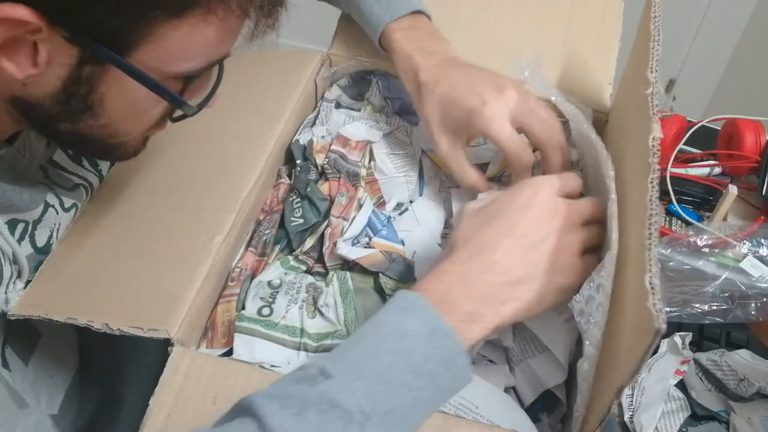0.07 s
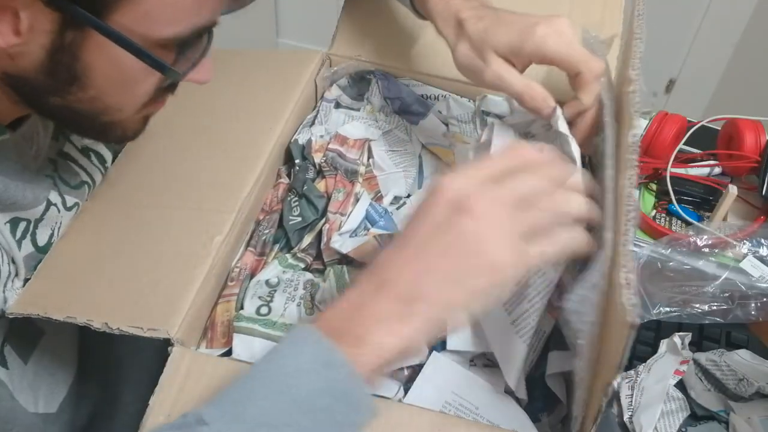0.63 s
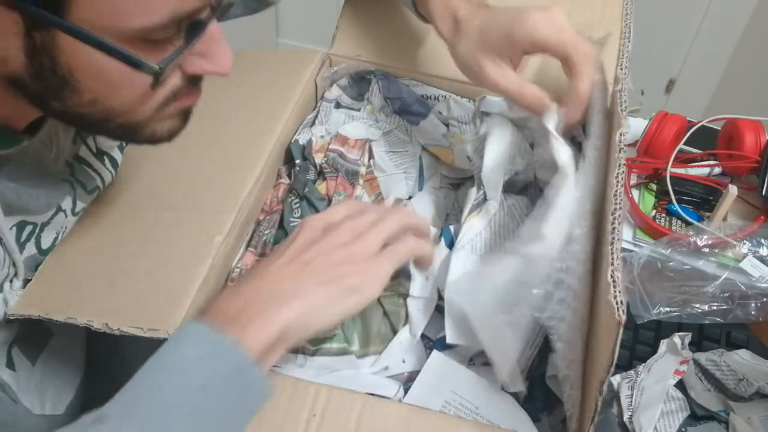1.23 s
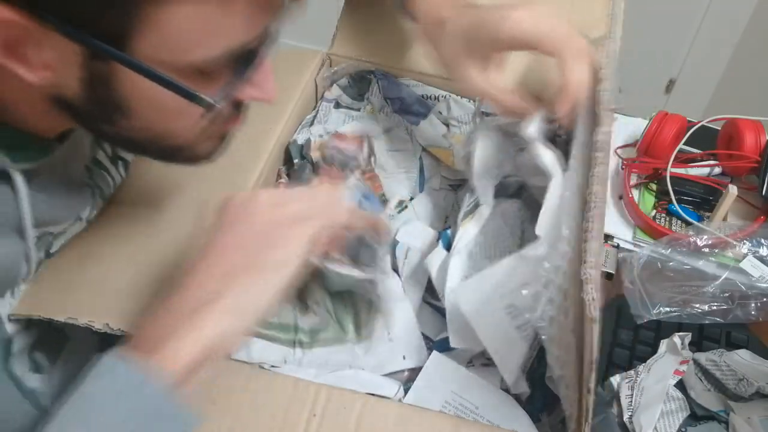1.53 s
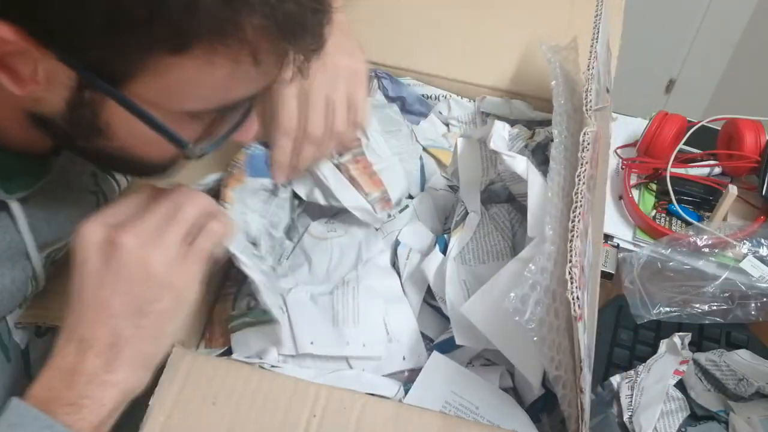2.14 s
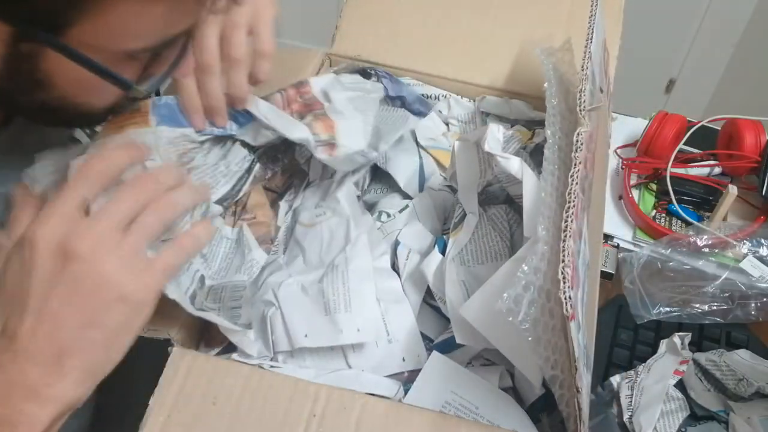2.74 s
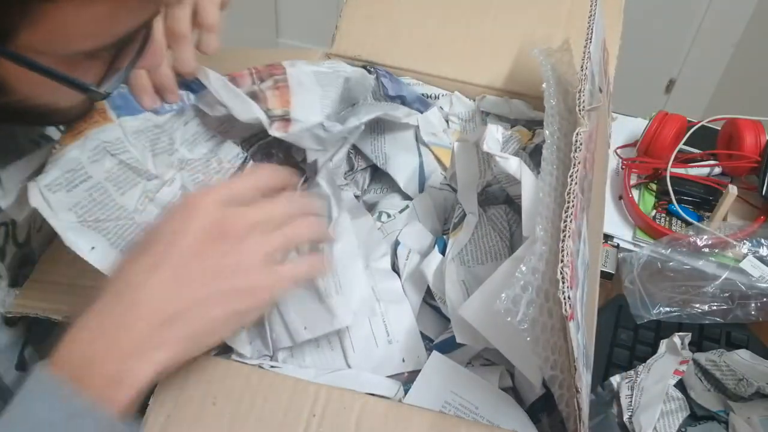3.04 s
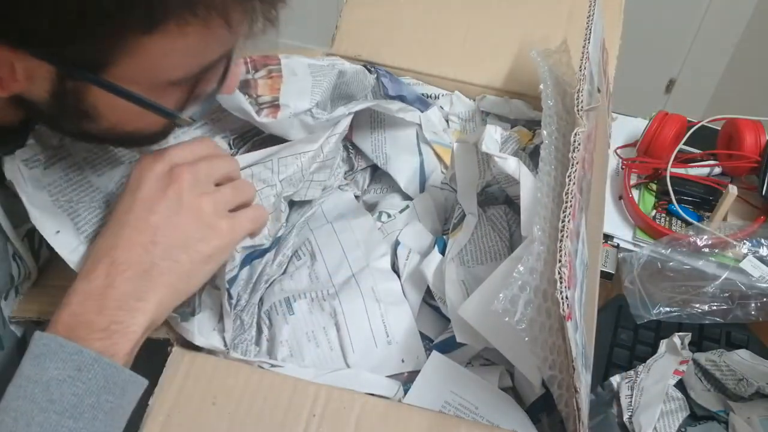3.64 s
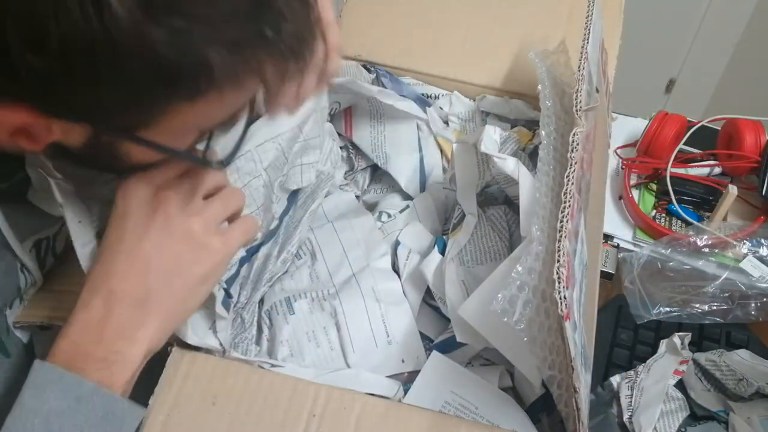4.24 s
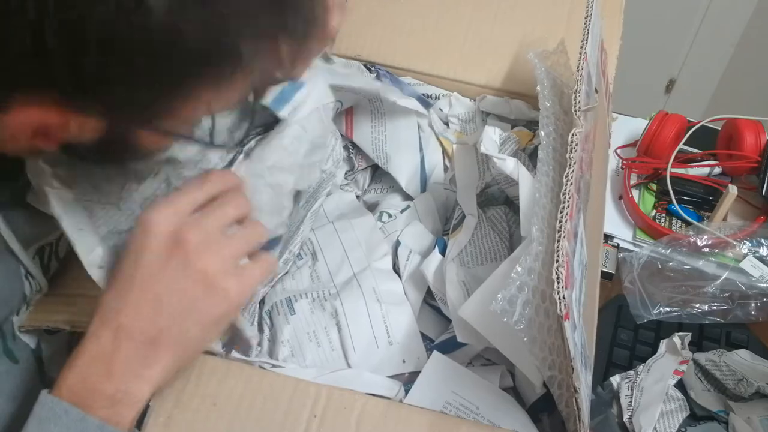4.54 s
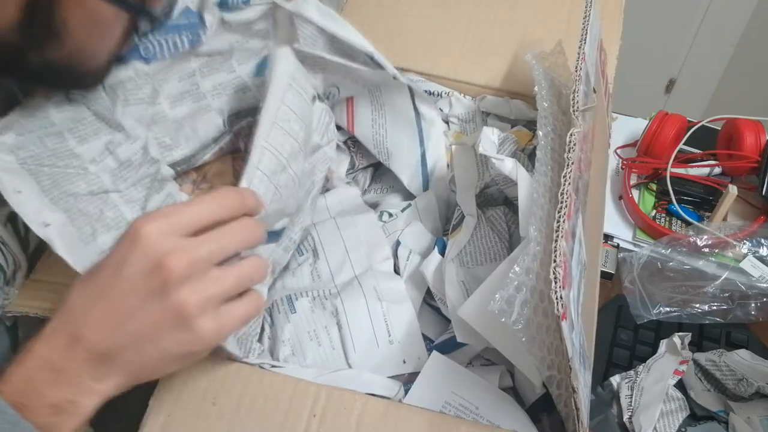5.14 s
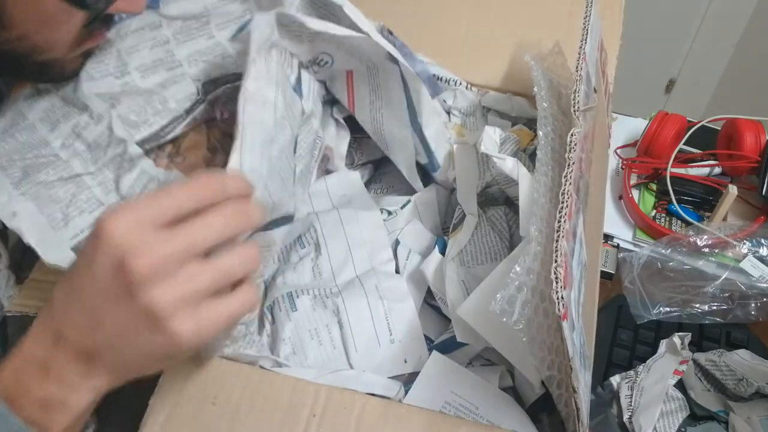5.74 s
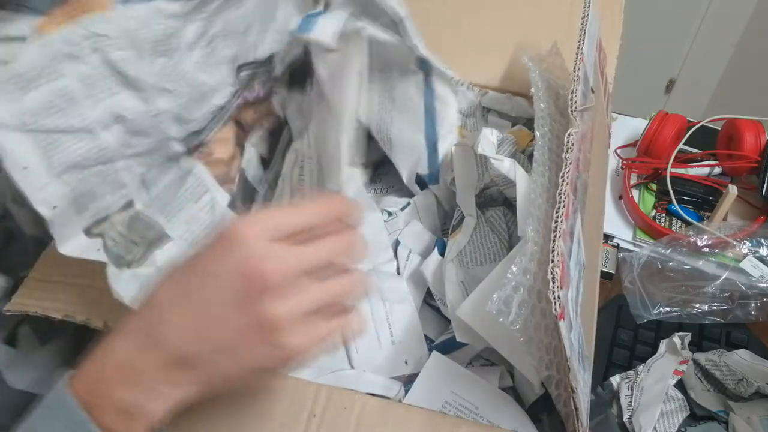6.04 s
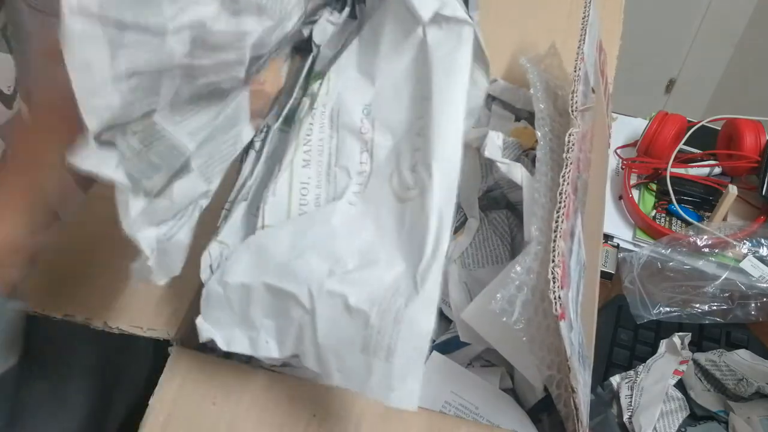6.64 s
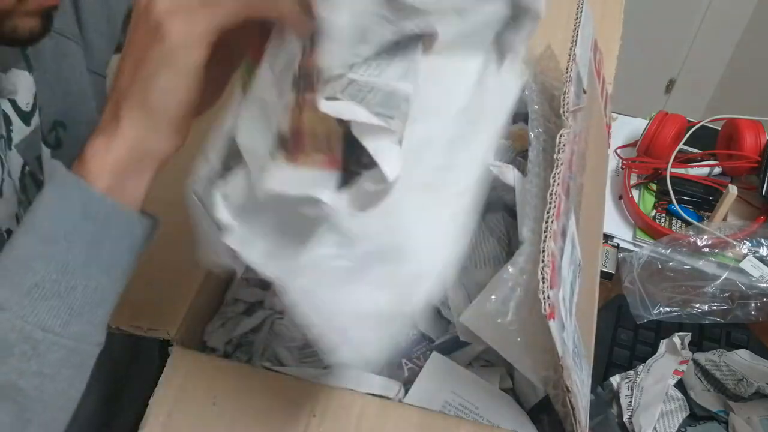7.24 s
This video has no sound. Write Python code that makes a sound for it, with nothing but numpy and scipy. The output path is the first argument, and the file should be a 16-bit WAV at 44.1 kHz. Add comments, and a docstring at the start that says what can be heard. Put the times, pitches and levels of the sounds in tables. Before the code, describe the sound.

Hands pull crumpled newspaper from a cardboard box, close to a stereo microphone in a small room with short echoes and a faint steady background. Light rustling opens the sound. From about 0.9 seconds the paper crinkles in short, uneven strokes, with bright, sharp snaps over a duller crackle of bending sheets. The box rumbles faintly under the dragging paper and gives soft thuds near 1 second and between 2.2 and 2.9 seconds. Snaps cluster around 3 seconds, followed by a brief sliding hiss and a flap at 3.4. After a lull, fuller, nearly continuous crinkling runs from 4 to 6 seconds, with a flurry of snaps near 4.7 and flaps and soft bumps around 5.6. The rustle eases, then swells as the sheet lifts clear, with a flap and the sharpest snap at about 7 seconds, faint puffs of air and a last crinkle.

```python
"""A small room, a stereo microphone close to a cardboard box: hands pull out crumpled newspaper.
Creases buckle in swarms of tiny clicks and single loud snaps; sheets flex, flip and slide over each other.
The box rumbles as paper drags on it and booms softly when bumped. Short echoes and faint room tone
lie behind it all, and the microphone's resonant ports colour the treble."""
import sys
import numpy as np
from scipy import signal
from scipy.fft import rfft, irfft
from scipy.io import wavfile
from scipy.ndimage import uniform_filter1d

SR = 44100
rng = np.random.default_rng(int(sys.argv[2]) if len(sys.argv) > 2 else 0)


def output_pcm(signal):
    """Save a mono or channel-first signal as 16-bit PCM at the path in sys.argv[1].

    Samples are clipped to [-1, 1] before scaling.
    """
    pcm = np.clip(np.atleast_2d(signal).T, -1, 1) * 32767
    wavfile.write(sys.argv[1], SR, np.round(pcm).astype(np.int16))


N = 330397
TIME = np.arange(N) / SR
CUTOFF_HZ = 16000


def handling(yield_db_per_s=13, stop_db_per_s=452, settle_db=-4, points=7500):
    """Crinkle and flex levels in dB: each hand stroke speeds up, eases as the paper yields, and stops."""
    # pushes, pulls and unfoldings: start_s, rise_s, hold_s, crinkle_db, flex_db
    strokes = [(0.0, 0.0042, 0.036, -42, -52), (.04, 0.11, 0.15, -49, -71),
               (0.151, 0.073, 0.18, -42.5, -49.5), (0.523, 0.034, 0.029, -46.5, -56.5),
               (.62, 0.077, 0.13, -57, -82), (0.784, 0.0046, 0.087, -46, -52),
               (0.884, 0.048, 0.061, -37.5, -45), (1.02, 0.022, 0.23, -49, -56.5),
               (1.239, 0.029, 0.042, -41, -47), (1.357, 0.0019, 0.021, -36.5, -45),
               (1.39, 0.095, 0.15, -51, -57.5), (1.51, 0.031, 0.21, -45.5, -49),
               (1.83, 0.0096, 0.28, -53.5, -59), (2.131, 0.0042, 0.01, -46, -52),
               (2.254, 0.0042, 0.15, -44.5, -55.5), (2.41, 0.008, 0.031, -37.5, -51),
               (2.472, 0.086, 0.079, -40, -49), (2.65, 0.017, 0.17, -54.5, -53.5),
               (2.823, 0.0078, 0.077, -40.5, -52.5), (2.92, 0.016, 0.027, -39.5, -45),
               (3.0, 0.027, 0.073, -69, -51), (3.116, 0.037, 0.13, -43.5, -50),
               (3.246, 0.012, 0.11, -35.5, -46.5), (3.526, 0.0052, 0.08, -45.5, -53),
               (3.765, 0.0034, 0.011, -51.5, -57.5), (4.05, 0.06, 0.14, -35.5, -45),
               (4.27, 0.04, 0.13, -41.5, -50.5), (4.419, 0.033, 0.23, -37.5, -46.5),
               (4.662, 0.0081, 0.273, -36, -45.5), (4.993, 0.009, 0.097, -43, -48),
               (5.066, 0.045, 0.12, -41.5, -48.5), (5.289, 0.083, 0.34, -41.5, -48),
               (5.598, 0.019, 0.038, -36.5, -42.5), (5.76, 0.11, 0.12, -44, -54),
               (5.95, 0.064, 0.087, -41.5, -48), (6.16, 0.11, 0.13, -48, -54),
               (6.342, 0.019, 0.16, -47, -52.5), (6.52, 0.12, 0.14, -51.5, -60.5),
               (6.74, 0.012, 0.16, -43.5, -54.5), (6.818, 0.023, 0.27, -39, -51),
               (7.201, 0.1, 0.083, -45, -51), (7.419, 0.022, 0.023, -38.5, -59.5)]
    t = np.linspace(0, N / SR, points)
    power = from_db([[-68], [-70]]) ** 2   # paper merely held; rows: crinkle, flex
    settle_db_per_s = np.array([[121], [76]])
    for start_s, rise_s, hold_s, crinkle_db, flex_db in strokes:
        rise = np.clip((t - start_s) / rise_s, 0, 1)
        easing = from_db(-yield_db_per_s * np.clip(t - start_s - rise_s, 0, hold_s))
        since_stop = np.maximum(t - start_s - rise_s - hold_s, 0)
        stopping = from_db(-stop_db_per_s * np.minimum(since_stop, 1))
        settling = from_db(settle_db - settle_db_per_s * since_stop)   # creases crackle on
        stroke = from_db([[crinkle_db], [flex_db]]) * rise * easing
        power = power + stroke ** 2 * (stopping ** 2 + settling ** 2)
    return [np.interp(TIME, t, level_db) for level_db in 10 * np.log10(power)]


def buckling(per_s, spread_db, low_hz, high_hz, rub_db, bands=10):
    """Facets pop in flurries, many small and few large, each at a broad pitch, over a rubbing hiss."""
    sizes = from_db(spread_db * np.minimum(rng.exponential(1, N), 3.6))
    # one crease sets off its neighbours
    flurry = from_db(6 * unit_rms(uniform_filter1d(rng.standard_normal(N), size=350)))
    clicks = sizes * (rng.random(N) < per_s / SR * flurry / flurry.mean())
    facet = rng.integers(0, bands, N)
    pops, friction = np.zeros(N), rng.standard_normal(N)
    for k, hz in enumerate(np.geomspace(low_hz, high_hz, bands)):
        fade = np.exp(-hz / (1.5 * SR))   # a pop lasts a few cycles
        energy = signal.lfilter([1], [1, -fade], clicks ** 2 * (facet == k) + 1e-18)
        pops += band(np.sqrt(energy) * friction, hz / 2, hz * 2)
    running_rms = np.sqrt(np.abs(uniform_filter1d(pops ** 2, size=3000)) + 1e-6)
    return pops / running_rms + from_db(rub_db) * rng.standard_normal(N)


def crinkle(level_db):
    """Tiny creases give way, more of them per second the harder the paper is worked."""
    # tone of the small creases: frequency_hz, gain_db
    spectrum = [(1200, -24.5), (2400, -7.5), (3400, -3), (9000, -0.5), (15000, -6)]
    per_s = 900 * from_db(0.38 * (level_db - np.median(level_db)))
    pops = buckling(per_s, spread_db=5.0, low_hz=2340, high_hz=12700, rub_db=-1.5)
    return from_db(level_db - 4.0) * unit_rms(colour(pops, spectrum))


def flexing(level_db):
    """Larger facets of the sheets pop in and out with a duller crackle."""
    # tone of the bending sheets: frequency_hz, gain_db
    spectrum = [(250, -17), (450, -6), (1000, -2), (1500, -0.6), (2300, -4), (4000, -2.5), (8000, -45)]
    per_s = 600 * from_db(0.46 * (level_db - np.median(level_db)))
    pops = buckling(per_s, spread_db=1.0, low_hz=600, high_hz=3100, rub_db=2.0)
    return from_db(level_db - 1.3) * unit_rms(colour(pops, spectrum))


def snaps(decay_s, kink_s, kink_db, crack_db, edge_db, edge_hz, body_db, size=1024, kinks=3):
    """A crease pops sharply and runs on through weaker kinks; the sheet around it answers lower down."""
    # single creases snapping through: start_s, level_db, pitch_hz, sheet_db (relative to the snap)
    creases = [(0.8868, -26, 11300, -8), (0.9392, -24, 9050, -2.5), (0.948, -23.5, 8900, -10),
               (0.9757, -20.5, 10200, -20), (1.017, -30, 8000, -21.5), (1.2691, -25.5, 8270, -8),
               (1.3375, -27, 8600, -4.5), (1.3614, -30, 10500, -3), (1.508, -34.5, 3730, 0),
               (1.6277, -20.5, 8400, -35.5), (1.7427, -19.5, 4250, -6.5), (1.9011, -28, 6200, -13),
               (2.184, -28, 8750, -11), (2.2606, -24.5, 9000, -12), (2.418, -25, 7550, -22),
               (2.565, -24.5, 9600, -29.5), (2.687, -26.5, 4100, -5), (2.827, -20, 7420, -30),
               (2.834, -23, 8300, -22), (2.941, -19.5, 7700, -8.5), (3.029, -27, 6900, -6.5),
               (3.125, -22, 7900, -4.5), (3.1628, -23.5, 7500, -37), (3.2685, -19, 8600, -25),
               (3.287, -22, 7500, -19), (3.4963, -28.5, 7450, -5), (3.565, -28, 9900, -40),
               (3.773, -32, 6200, -2.5), (3.8444, -37.5, 7400, -20), (4.0855, -29.5, 7600, -24),
               (4.117, -32, 7900, -1), (4.163, -24, 4350, -5), (4.508, -23, 8900, -35),
               (4.6646, -22.5, 8600, -6.5), (4.685, -21, 8000, -10), (4.7346, -19, 8800, -37),
               (4.7474, -25, 8650, -18), (4.854, -26, 7800, -3), (4.872, -22, 8440, -9),
               (4.921, -25, 8200, -9), (5.141, -22.5, 8400, -20), (5.400, -21, 9700, -14),
               (6.1136, -25, 7900, -17), (6.7545, -28.5, 5200, -11.5), (6.951, -22, 8100, -25),
               (7.0322, -15.5, 7600, -27)]
    out, t = np.zeros(N), TIME[:size]
    for start_s, level_db, pitch_hz, sheet_db in creases:
        force = burst(decay_s, size) + .5 * (t == 0)
        delays_s = np.cumsum(kink_s * rng.uniform(.5, 2, kinks))
        for k, delay_s in enumerate(delays_s, 1):
            force += from_db(k * kink_db) * np.interp(t - delay_s, t, burst(decay_s, size), left=0)
        edge = band(force, edge_hz, CUTOFF_HZ, order=2)
        sparkle_db = edge_db + 20 * np.log10(pitch_hz / edge_hz)   # tighter folds sparkle more
        crack = band(force, pitch_hz * 0.68, pitch_hz * 1.325, order=2)   # rings for a cycle or two
        body = band(force, 960, 2800, order=2)
        parts = [(sparkle_db, edge), (crack_db, crack), (sheet_db + body_db, body)]
        snap = sum(from_db(db) * part / np.linalg.norm(part) for db, part in parts)
        add(out, start_s, from_db(level_db) * snap)
    return out


def flaps(cycles, width, ring_db, size=4096):
    """A wide sheet flips over with a clap and a hollow ring; larger, lower ones last longer."""
    # sheets flipping over: start_s, level_db, pitch_hz
    flips = [(1.742, -42.5, 342), (3.390, -27, 1370), (4.787, -30, 1410), (5.626, -24, 1314),
             (5.682, -31, 493), (5.866, -34.5, 1190), (6.638, -35, 1700), (6.95, -25.5, 1930),
             (7.242, -33.5, 1510)]
    # modes of a bulging sheet: pitch_ratio
    sheet_modes = [0.96, 1.7]
    out, t = np.zeros(N), TIME[:size]
    ratio = np.array(sheet_modes)[:, None]
    for start_s, level_db, hz in flips:
        clap = band(burst(cycles / hz, size), hz / (1 + width), hz * (1 + width), order=2)
        modes = np.sin(2 * np.pi * hz * ratio * t) / ratio
        ring = modes.sum(axis=0) * np.exp(-t * hz / cycles)
        flap = unit_rms(clap) + from_db(ring_db) * unit_rms(ring)
        add(out, start_s, from_db(level_db) * flap / np.abs(flap).max())
    return out


def box(drag_db, thud_db, contact_per_s):
    """Paper dragging on the cardboard makes it rumble; soft bumps set its panels booming."""
    # tone of the rumbling cardboard: frequency_hz, gain_db
    spectrum = [(45, -35), (95, -4.5), (145, -2), (230, -9), (300, 0.5), (420, -6), (800, -27)]
    # hands and wads bumping the box: start_s, level_db
    bumps = [(0.949, -34), (2.193, -36.5), (2.563, -36), (2.62, -28.5), (2.682, -32), (2.884, -36.5),
             (4.224, -34.5), (5.54, -29), (5.637, -31), (6.025, -31.5)]
    # modes of the panels: pitch_hz, level_db, t60_s
    panels = [(101, -14, 0.059), (128, 6.5, 0.068), (156.2, -4, 0.22), (209, -7, 0.12), (276, -7.5, 0.15),
              (425, 3.5, 0.04), (584, -1, 0.1)]
    drag = buckling(per_s=160, spread_db=1.5, low_hz=101, high_hz=400, rub_db=10)
    out = from_db(drag_db) * unit_rms(colour(drag, spectrum))
    t = TIME[:SR // 3]
    hz, mode_db, t60_s = np.transpose(panels)[:, :, None]
    for start_s, level_db in bumps:
        strengths = from_db(mode_db + 0.72 * rng.standard_normal(hz.shape))   # vary with the spot hit
        phases = 2 * np.pi * (hz * t + rng.random(hz.shape))
        modes = strengths * from_db(-60 * t / t60_s) * np.sin(phases)
        thud = modes.sum(axis=0) * (1 - np.exp(-t * contact_per_s))
        add(out, start_s, from_db(level_db + thud_db) * thud / np.abs(thud).max())
    return out


def slide(start_s, length_s, level_db, low_hz):
    """Fibres rub as a sheet slips out: a bright hiss that swells and fades with its speed."""
    progress = np.clip((TIME - start_s) / length_s, 0, 1)
    hiss = unit_rms(band(rng.standard_normal(N), low_hz, CUTOFF_HZ, order=2))
    return from_db(level_db) * np.sin(np.pi * progress) * hiss


def billows(swell_s, low_hz, high_hz, size=12000):
    """The lifted sheet bellies out and pushes a low puff of air that swells and dies."""
    # puffs of air: start_s, level_db
    puffs = [(6.838, -49), (7.312, -48)]
    out, age = np.zeros(N), TIME[:size] / swell_s
    for start_s, level_db in puffs:
        air = unit_rms(band(rng.standard_normal(size), low_hz, high_hz, order=2))
        add(out, start_s, from_db(level_db) * age * np.exp(1 - age) * air)
    return out


def room(x, near_db, near_s, tail_db, tail_s, lag_s, size=16384, hop=1536):
    """The microphone hears direct sound, scatter off nearby folds and box walls, and the room's tail."""
    # likeness of the echoes at the two ports, near equal in the bass: frequency_hz, correlation
    echo_likeness = [(130, 0.97), (240, 0.79), (370, 0.21), (560, -0.74), (1250, 0.36), (2700, -0.14)]
    hz = np.fft.rfftfreq(size, 1 / SR)
    spread = np.arccos(np.interp(hz, *np.transpose(echo_likeness))) / 2
    stages = [(near_db, near_s), (tail_db, tail_s)]   # times to fall to 1/e
    fade = np.sqrt(sum(from_db(db) ** 2 * 2 / (s * SR) * np.exp(-2 * TIME[:size] / s)
                       for db, s in stages))
    window = signal.windows.hann(2 * hop, sym=False)
    out, padded = np.zeros((2, N + 2 * size)), np.pad(x, (hop, size))
    for start in range(0, N + hop, hop):   # the sounding spot moves, so each moment has its own echoes
        moment = rfft(padded[start:start + 2 * hop] * window, size)
        mid, side = rfft(fade * rng.standard_normal((2, size)))
        echoes = np.cos(spread) * mid + np.sin(spread) * side * [[1], [-1]]
        delays_s = lag_s * rng.standard_normal() * np.array([[.5], [-.5]])   # one port is nearer
        direct = np.exp(-2j * np.pi * hz * delays_s)
        out[:, start:start + size] += irfft(moment * (direct + echoes))
    return out[:, hop:hop + N]


def room_tone(level_db):
    """A faint, steady rumble and hiss, alike in both channels."""
    # tone of the quiet room: frequency_hz, gain_db
    spectrum = [(28, -15), (44, -1), (60, -12), (150, -9.5), (400, -11), (1500, -18), (15000, -21.5)]
    return from_db(level_db) * unit_rms(colour(rng.standard_normal(N), spectrum))


def from_db(db):
    """Decibels to gain."""
    return 10 ** (np.asarray(db) / 20)


def unit_rms(x):
    """Scale to unit rms."""
    return x / np.sqrt(np.mean(x ** 2) + 1e-20)


def band(x, low_hz, high_hz, order=1):
    """Causal band-pass."""
    edges_hz = np.clip([low_hz, high_hz], 10, .45 * SR)
    return signal.sosfilt(signal.butter(order, edges_hz, "band", fs=SR, output="sos"), x + 1e-18)


def colour(x, spectrum, size=4096):
    """Minimum-phase filter through rows of frequency_hz, gain_db."""
    hz, db = np.transpose(spectrum)
    grid_hz = np.maximum(np.fft.rfftfreq(size, 1 / SR), 1)
    gain = from_db(np.interp(np.log(grid_hz), np.log(hz), db))
    cepstrum = irfft(np.log(gain))
    cepstrum[1:size // 2] *= 2
    cepstrum[size // 2 + 1:] = 0
    return signal.oaconvolve(x, irfft(np.exp(rfft(cepstrum))))[:len(x)]


def burst(decay_s, size):
    """Noise that dies away exponentially; unit energy."""
    noise = rng.standard_normal(size) * np.exp(-np.arange(size) / SR / decay_s)
    return noise / np.linalg.norm(noise)


def add(track, start_s, sound):
    """Mix a short sound into a track."""
    start = round(start_s * SR)
    track[start:start + len(sound)] += sound[:max(N - start, 0)]


def scene():
    """Paper and box at close range, the small room behind them."""
    crinkle_db, flex_db = handling()
    cracks = snaps(decay_s=0.00079, kink_s=0.0011, kink_db=-4.5, crack_db=10.0,
                   edge_db=3.5, edge_hz=9200, body_db=10.5)
    paper = crinkle(crinkle_db) + flexing(flex_db) + cracks
    paper += slide(start_s=3.25, length_s=0.17, level_db=-48, low_hz=9500)
    paper += flaps(cycles=4.9, width=0.36, ring_db=-4.0)
    lifted_db = -6 * np.clip((TIME - 5.9) * 2, 0, 1)   # the sheet comes clear of the cardboard
    cardboard = box(drag_db=flex_db + lifted_db - 12.0, thud_db=-9.5, contact_per_s=186)
    heard = room(paper + cardboard, near_db=-1.0, near_s=0.0032, tail_db=3.5, tail_s=.08, lag_s=.00003)
    heard += from_db(-2.0) * cracks   # the loud snaps face the microphone, so they sound drier
    heard += billows(swell_s=0.023, low_hz=126, high_hz=296)   # dry: the sheet is held up close
    return from_db(-4.5) * heard + room_tone(level_db=-64.5)


def record(dry):
    """Each port of the stereo microphone colours the treble in its own way; the top is cut steeply."""
    # response of the left port: frequency_hz, gain_db
    left_port = [(8100, 1.45), (9000, 1.5), (10000, -7.5), (10800, -9.5), (13300, 1), (16000, -6)]
    # response of the right port: frequency_hz, gain_db
    right_port = [(5500, 2), (7100, 6), (8000, 12.5), (8600, 13.5), (10500, 0), (13000, -3), (16000, -6.5)]
    ports = np.array([colour(dry[0], left_port), colour(dry[1], right_port)])
    return signal.sosfilt(signal.ellip(10, .1, 80, CUTOFF_HZ, fs=SR, output="sos"), ports)


dry = scene()
out = record(dry)
output_pcm(out)
```